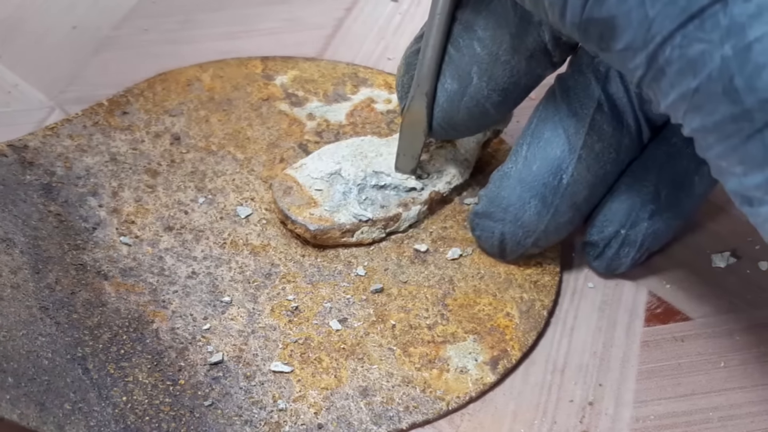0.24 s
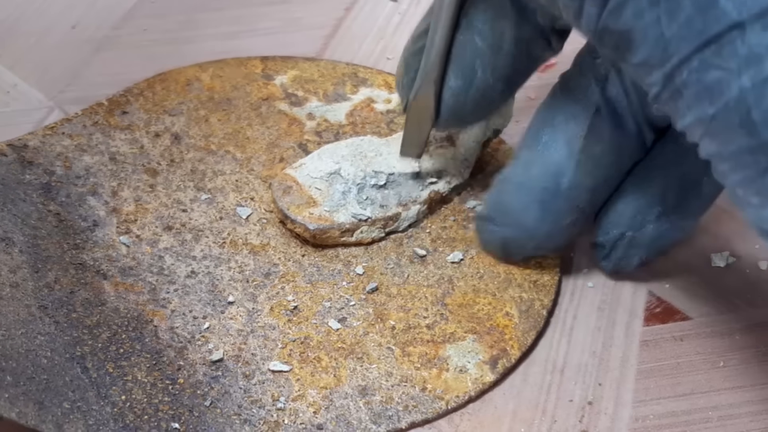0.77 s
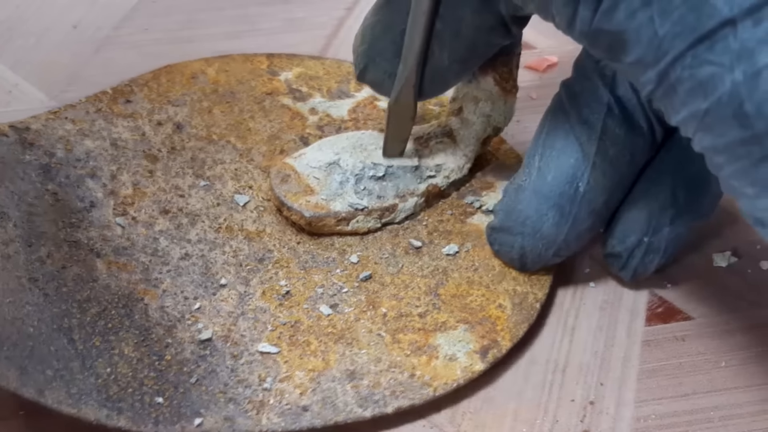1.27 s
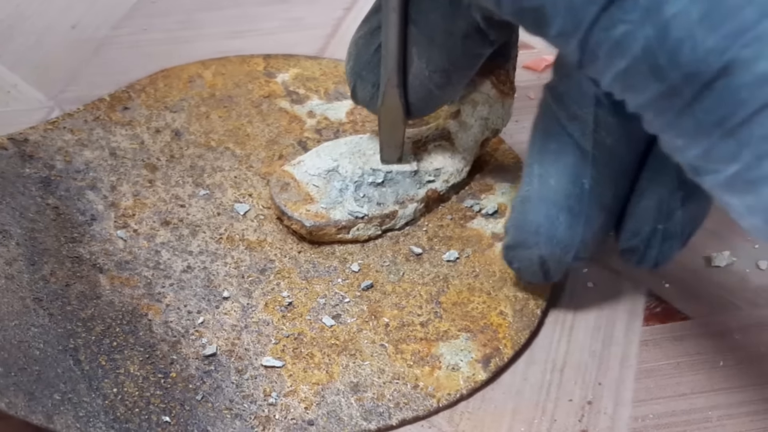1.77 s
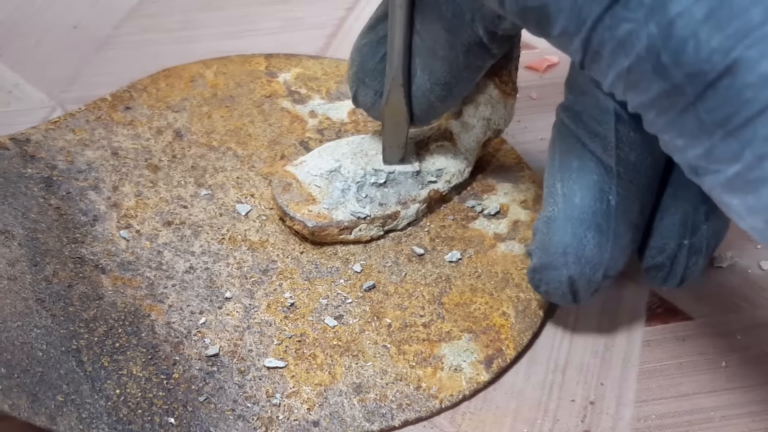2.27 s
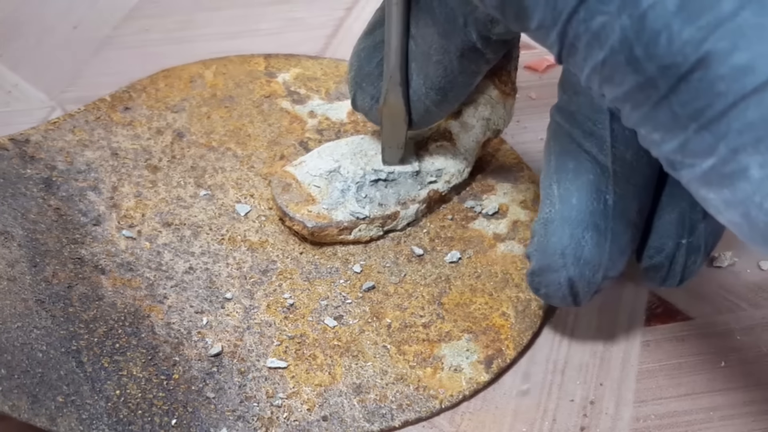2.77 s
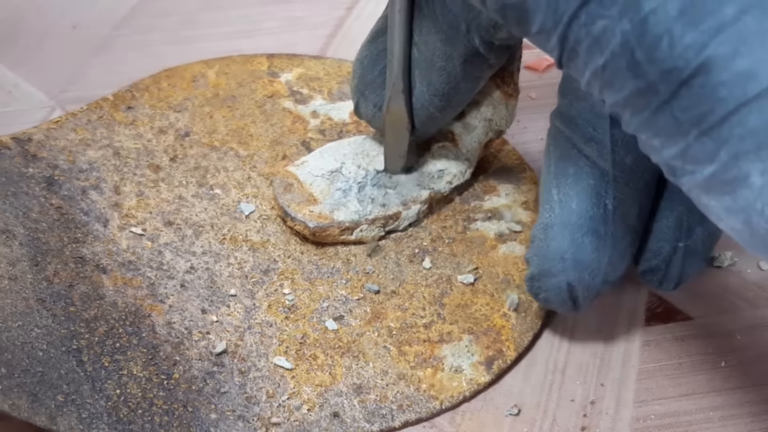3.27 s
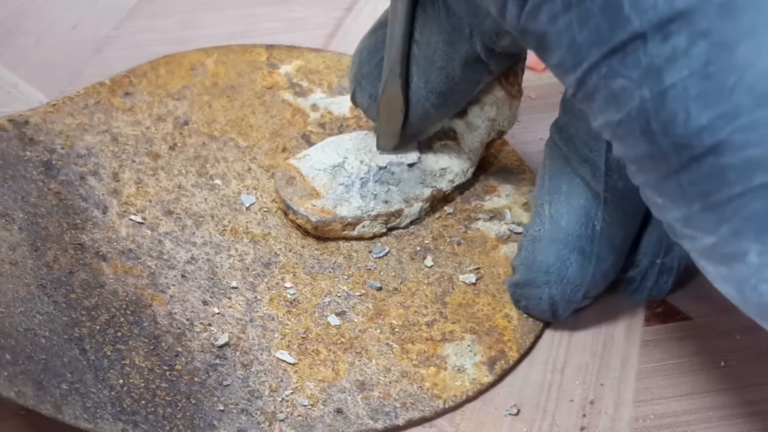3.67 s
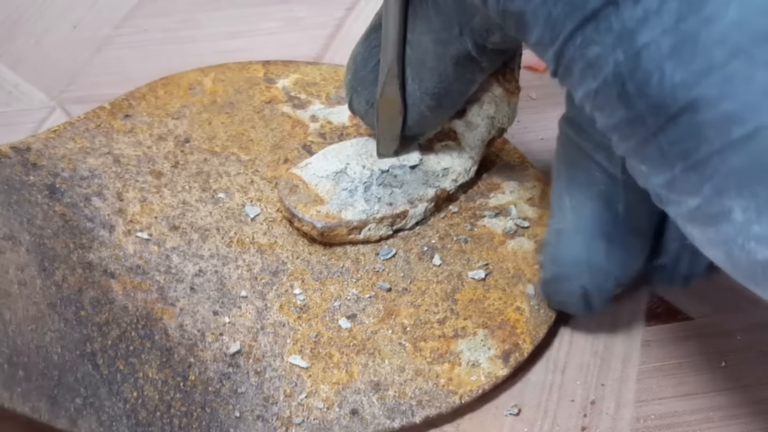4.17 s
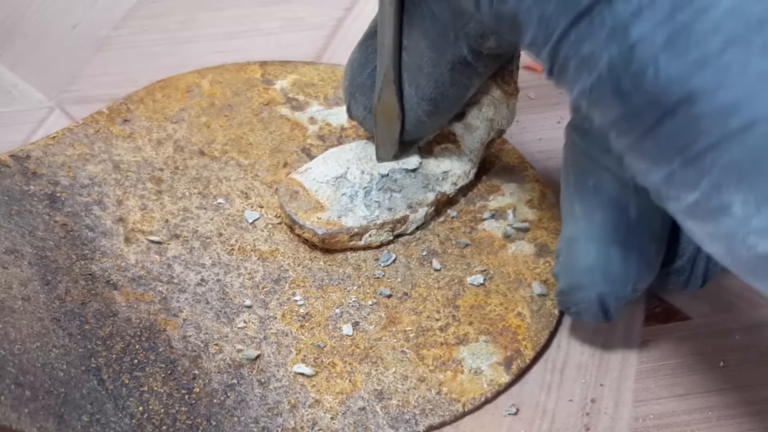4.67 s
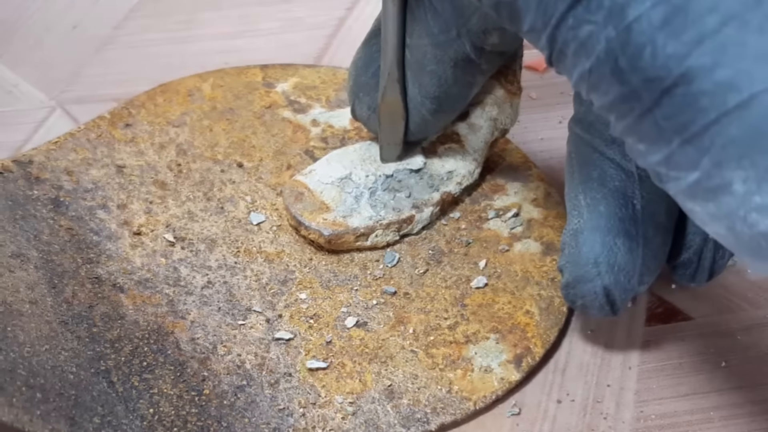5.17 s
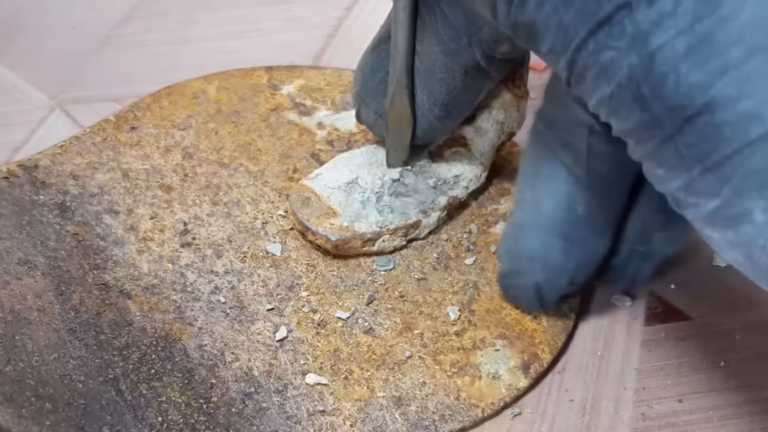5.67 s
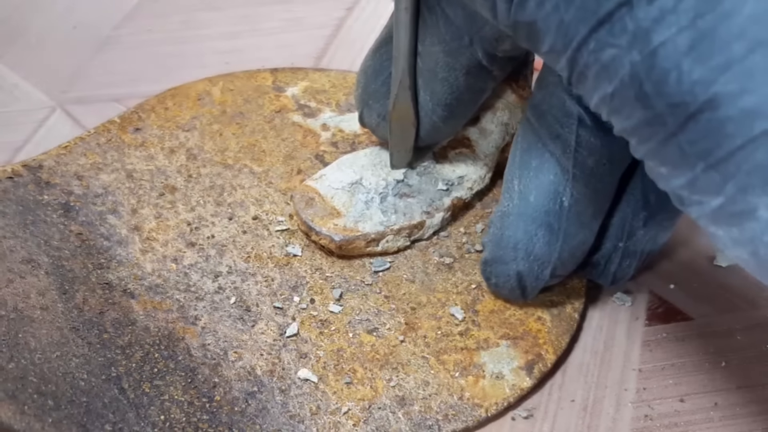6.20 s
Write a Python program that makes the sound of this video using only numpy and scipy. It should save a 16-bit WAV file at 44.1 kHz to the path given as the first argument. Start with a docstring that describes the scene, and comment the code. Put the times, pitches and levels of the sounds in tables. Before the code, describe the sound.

A hammer taps a steel chisel into crust on a rusty iron plate, hard clanks with low bench thumps, pauses, and flying chips ticking.

```python
"""A clank and a low thump come first: a hammer taps a steel chisel into the crust on a rusty iron plate.
The plate lies on a wooden bench in a small room. Fading sine waves make the clank, rings and low thump,
and short noise bursts make the cracking crust and the ticks of its landing chips.
Between bursts of blows the plate knocks softly on the bench and the blade scrapes and clinks.
A quiet floor of air noise with a faint, wavering hum runs underneath."""
import sys
import numpy as np
from scipy import signal
from scipy.fft import rfft, irfft
from scipy.io import wavfile
from scipy.ndimage import uniform_filter1d

SR = 44100
rng = np.random.default_rng(int(sys.argv[2]) if len(sys.argv) > 2 else 0)


def generate_wav(signal):
    """Clip the signal to [-1, 1] and save it as 16-bit WAV at the path in sys.argv[1]."""
    frames = np.transpose(np.atleast_2d(signal))
    scaled = np.clip(frames, -1, 1) * 32767
    pcm = np.round(scaled).astype(np.int16)
    wavfile.write(sys.argv[1], SR, pcm)


N = 284004

# In all tables, fade/s is the time a sound takes to drop by 60 dB.
# Air noise, relative spectrum: f/Hz, density/dB per Hz
AIR_COLOUR = [(15, -73), (30, -23), (85, -21), (150, -24), (330, -23), (410, -15.5), (460, -25.5),
              (800, -20), (1900, -30), (3300, -47.5), (7000, -49), (8500, -65), (16400, -60)]
# Air noise before its small swells: t/s, level/dB
AIR_LEVEL = [(0, -69), (2, -66), (3.6, -70), (6.44, -70)]
# The hum comes and goes: t/s, level/dB
HUM_LEVEL = [(0, -68), (.6, -79), (1.05, -64.5), (1.3, -78.5), (1.8, -71), (2, -65.5), (3.5, -99.5),
             (3.95, -73.5), (4.3, -70), (6.44, -71.5)]
# Likeness of left and right noise: f/Hz, likeness (1 same, 0 unrelated, -1 opposite)
LIKENESS = [(60, .87), (130, 0.53), (290, 1), (640, -0.46), (1400, -0.18), (3000, 0.008)]
# How long the room rings: f/Hz, fade/s
ROOM_FADE = [(300, 0.52), (1100, 0.32), (2900, 0.33), (5000, 0.26), (7700, 0.25), (14000, 0.23)]
# Room sound against the direct sound: f/Hz, level/dB
ROOM_COLOUR = [(400, 9), (1000, -0.5), (3000, -6), (8000, -11), (14000, -7)]
# Stroke of the blade over the crust, before the grit: t/s, level/dB
SCRAPE_LEVEL = [(1.42, -115), (1.44, -75.5), (1.601, -83), (1.631, -65.5), (1.698, -65), (1.714, -58),
                (1.735, -93), (1.8, -82.5)]
# Scrape noise, relative spectrum: f/Hz, density/dB per Hz
SCRAPE_COLOUR = [(880, 7.5), (1500, 10.5), (7090, 5.5), (9020, -9.5), (13200, 2), (16400, -17)]
# The plate knocks on the bench as it is shifted: t/s, level before the soft onset/dB, centre f/Hz
PLATE_KNOCKS = [(.617, -51.5, 1030), (.638, -51, 1010), (.646, -44.5, 330), (1.364, -52, 122),
                (1.392, -60, 165), (1.433, -55.5, 190), (1.509, -46.5, 129), (1.536, -46, 136),
                (3.722, -61.5, 192.7), (3.82, -55.5, 188)]
# The blade rebounds lightly off the plate: f/Hz, level/dB, fade/s
CLINK_TONES = [(2330, -40, .08), (5000, -52, .08), (3900, -55, .07), (6100, -55, .06)]
# Chips of crust and rebounds of the blade: t/s, level before panning and onset/dB, centre f/Hz
CHIP_TICKS = [(.4398, -53, 4760), (.4676, -49, 5400), (.539, -58, 6900), (.5926, -61, 6530),
              (.621, -63, 4700), (.6425, -61, 5500), (.648, -55.5, 3500), (.7706, -73, 6700),
              (1.4331, -72, 6800), (2.797, -60, 3980), (2.9781, -47, 3850), (3.0925, -57, 5500),
              (3.117, -63, 7040), (3.1632, -66, 4300), (3.1833, -66, 5400), (3.4458, -71, 7000),
              (3.4844, -67, 3574), (3.525, -70.5, 6470), (3.714, -72, 3900), (3.82, -69.5, 6300),
              (4.2092, -53, 4400), (4.211, -58, 10500), (5.8726, -40, 3440), (6.049, -64.5, 5100)]
# Low modes of bench and room, relative levels: f/Hz, level/dB, fade/s
LOW_MODES = [(76, -15, .8), (114, -8, .42), (151.5, 2, .46), (194, 2, .27), (231, -5, .42), (269, -2, .4),
             (290, 3, .38), (332, -1, .27), (365, 1, .22), (403, 4, .3), (453, 8, .22), (485, 0, .22),
             (537, 4, .14), (580, -2, .25)]
# Dull knock of the bench top, against the thump: f/Hz, level/dB, fade/s
BENCH_THUD = [(399.8, -8.5, 0.03), (215, -17.5, 0.056), (646, -11, 0.009)]
# Plate and blade, damped by glove and crust, relative levels: f/Hz, width/Hz, level/dB
STEEL_MODES = [(833, 105, 13.5), (1157, 101.4, 6.5), (1370, 169, 7), (1470, 130, -0.5), (1638, 124, 0.5),
               (1890, 160, -1.5), (2340, 83, -7.5), (2820, 150, -6.5), (3206, 100, -4.5), (3920, 140, 0.5),
               (4950, 200, -12), (6197, 110, 0.5), (7050, 230, 10), (9700, 120, -20.5), (11100, 250, -21.5),
               (14400, 400, -25)]
# Breaking crust, relative spectrum: f/Hz, density/dB per Hz
CRACK_COLOUR = [(450, -20), (650, -1.5), (1500, 2), (2500, 6.5), (3500, 5.5), (5000, 0), (7000, 7.5),
                (8300, -6), (10500, 3), (16000, -11)]
# Long rings, against the ring levels of each blow: f/Hz, level/dB, fade/s
HAMMER_TONES = [(3111, 1.5, .45)]
CHISEL_TONES = [(9400, -4, .2), (10700, -3, .2), (12966, 1, .38), (15138, 0, .27)]
# Centres of body, clank, snap and tick: f/Hz
BLOW_BANDS_HZ = (800, 1400, 4000, 11000)
# Every blow: t/s, then level/dB of bench thump, plate clank, steel-on-steel snap, treble tick,
# hammer ring and chisel ring, then the pitch the plate favours f/Hz
BLOWS = [(.033, -32.5, -31, -34.5, -43, -78, -80, 1370), (.333, -19, -25.5, -28, -39, -75, -66, 1140),
         (1.8136, -45.5, -40, -40.5, -56, -61.5, -77, 3200), (2.059, -25, -21, -19, -37.5, -63, -62, 2850),
         (2.355, -26, -24, -18.5, -36.5, -41.5, -78.5, 1380), (2.666, -22, -21.5, -20, -36, -49, -68, 1210),
         (2.936, -19.5, -29, -21.5, -28.5, -45.5, -60.5, 1450),
         (3.223, -16.5, -28, -20.5, -33.5, -40, -73.5, 2340),
         (4.094, -33.5, -36.5, -31.5, -46, -58, -65, 1577),
         (4.413, -21, -22.5, -25.5, -32.5, -56.5, -61, 1234), (4.676, -23.5, -20, -19, -29, -38, -67, 1704),
         (4.981, -19.5, -22, -23.5, -30, -42.5, -68, 1790),
         (5.253, -18.5, -19, -24, -28.5, -47.5, -67, 1764),
         (5.528, -18.5, -21, -26, -25.5, -43, -64.5, 1050), (5.811, -19, -19, -21, -29.5, -39, -65, 1750),
         (6.099, -20.5, -18, -25, -28, -42.5, -58.5, 776), (6.371, -23, -17.5, -20, -31, -48, -63, 1160)]

HUM_HZ, HUM_WIDTH_HZ = 116, 7
CLINK_S = 4.188
CRUMBS, CRUMB_DB, CRUMB_HZ = 14, -76, (4000, 7200)  # faint crumbs: count, middle level, pitch range
CHIP_PAN_DB = 4  # typical left-right level difference
BLOOM_DB, BLOOM_HZ, BLOOM_RISE_S, BLOOM_T60_S = -16, 330, 0.008, 0.32  # level is against the thump
# Flutter echo between two walls: spacing, first level against the thump, loss a trip, pulse width
FLUTTER_S, FLUTTER_DB, FLUTTER_LOSS_DB, KNOCK_S = 0.024, -2.5, 3.5, 0.0007
BOOM_TOP_HZ = 220  # modes below are the room's
FIRM_THUMP_DB, BOOM_DB, BOOM_DB_PER_DB = -18, -27.5, 1.35  # room boom grows faster than the thump
BODY_DB = -15  # plate body, against the thump
FAVOUR_DB, FAVOUR_OCTAVES = 6, .15  # the seat of the blade lifts plate modes near one pitch
EDGE_HZ = 16500  # top of the band


def gain_of(db):
    """Turn decibels into a plain multiplier."""
    return 10 ** (np.asarray(db) / 20)


def evened(x):
    """Scale a sound to an average (rms) level of 1."""
    return x / np.sqrt(np.mean(x ** 2) + 1e-20)


def read(points, hz):
    """Read a table at any pitch, along a logarithmic pitch scale."""
    f, value = np.transpose(points)
    return np.interp(np.log(hz + 1), np.log(f + 1), value)


def panned(db):
    """Left and right gains that differ by the given decibels."""
    return gain_of(np.array([[db], [-db]]) / 2)


def add(mix, s, sound):
    """Mix in a sound at a given second, cut off at the end of the scene."""
    part = mix[:, round(s * SR):][:, :sound.shape[1]]
    part += sound[:, :part.shape[1]]


def fading_tone(t, hz, db, t60, turns=0):
    """A sine wave that loses 60 dB in t60 seconds; turns shifts its start, in cycles."""
    return gain_of(db - 60 * t / t60) * np.sin(2 * np.pi * (hz * t) + 2 * np.pi * turns)


def onset(t, rise):
    """A smooth start, most of the way up after rise seconds."""
    return 1 - np.exp(-t / rise)


def coloured(points, size):
    """Two-channel noise of a given spectrum, with a left-right likeness that depends on pitch."""
    hz = np.fft.rfftfreq(size, 1 / SR)
    left, other = rfft(rng.standard_normal((2, size)))
    same = np.clip(read(LIKENESS, hz), -1, 1)
    right = same * left + np.sqrt(1 - same ** 2) * other
    return evened(irfft(np.array([left, right]) * gain_of(read(points, hz)), size))


def puffs(events, spread, t60, rise):
    """Each contact is a short fading puff of noise around its own centre pitch."""
    out, t = np.zeros((2, N)), np.arange(SR // 3) / SR
    noises = rng.standard_normal((len(events), 2, len(t)))
    for (s, db, hz, *pan_db), noise in zip(events, noises):
        edges = [hz / spread, min(hz * spread, 18000)]
        band = signal.butter(2, edges, "bandpass", fs=SR, output="sos")
        noise = noise if pan_db else noise[[0, 0]]  # without a pan, both sides hear the same noise
        puff = evened(signal.sosfilt(band, noise)) * gain_of(db - 60 * t / t60) * onset(t, rise)
        add(out, s, panned(sum(pan_db)) * puff)
    return out


def floor():
    """Distant air noise that swells a little, and a wavering hum of narrow-band noise."""
    t = np.arange(N) / SR
    swell = evened(sum(np.sin(2 * np.pi * (f * t + rng.random())) / np.sqrt(f)
                       for f in np.geomspace(.5, 12, 16)))
    edges = [HUM_HZ - HUM_WIDTH_HZ / 2, HUM_HZ + HUM_WIDTH_HZ / 2]
    band = signal.butter(1, edges, "bandpass", fs=SR, output="sos")
    hum = evened(signal.sosfilt(band, rng.standard_normal(N)))
    hum = hum * gain_of(np.interp(t, *np.transpose(HUM_LEVEL)))
    air_db = np.interp(t, *np.transpose(AIR_LEVEL)) + 1.1 * swell
    return coloured(AIR_COLOUR, N) * gain_of(air_db) + hum


def room(x):
    """Sparse echoes of random sign, one in every 20 samples, each band dying at its own speed."""
    taps = np.zeros((2, SR))
    at = np.arange(160, SR - 20, 20)
    at = at + rng.integers(0, 20, (2, len(at)))
    np.put_along_axis(taps, at, rng.choice([-1., 1.], at.shape), 1)
    hz, t, bands = signal.stft(taps, SR, nperseg=256)
    bands = bands * gain_of(-60 * t / read(ROOM_FADE, hz)[:, None])
    plain = signal.istft(bands, SR, nperseg=256)[1]
    tail = signal.istft(bands * gain_of(read(ROOM_COLOUR, hz))[:, None], SR, nperseg=256)[1]
    # the uncoloured left tail sets the scale
    return signal.fftconvolve(x, tail / np.linalg.norm(plain[0]), axes=1)[:, :N]


def scrape():
    """The blade drags over the crust: noise with a gritty, jumpy level under the stroke."""
    s, db = np.transpose(SCRAPE_LEVEL)
    t = np.arange(s[0], s[-1], 1 / SR)
    grit_db = 3 * evened(uniform_filter1d(rng.standard_normal(len(t)), 60))
    stroke = gain_of(np.interp(t, s, db) + grit_db) * signal.windows.tukey(len(t), .1)
    out = np.zeros((2, N))
    add(out, s[0], coloured(SCRAPE_COLOUR, len(t)) * stroke)
    return out


def knocks():
    """The plate meets the bench in soft, dull noise puffs."""
    return puffs(PLATE_KNOCKS, spread=1.29, t60=0.14, rise=0.0067)


def clink():
    """A light touch of steel: a few short tones with a soft start."""
    out, t = np.zeros((2, N)), np.arange(SR // 4) / SR
    ring = sum(fading_tone(t, *tone) for tone in CLINK_TONES)
    add(out, CLINK_S, (ring * onset(t, .015) ** 2)[None])
    return out


def chips():
    """Bright noise ticks scattered left and right, plus faint crumbs at chance moments."""
    when, size, pitch = rng.random((CRUMBS, 3)).T
    crumb_db = CRUMB_DB + 6 * (size - .5)
    crumbs = np.transpose([when * N / SR, crumb_db, np.interp(pitch, (0, 1), CRUMB_HZ)])
    ticks = np.vstack([CHIP_TICKS, crumbs])
    pan_db = CHIP_PAN_DB * rng.standard_normal((len(ticks), 1))
    return puffs(np.hstack([ticks, pan_db]), spread=1.6, t60=.03, rise=.0002)


def bloom():
    """The bench rumbles roughly just after each blow: a longer, low puff of noise."""
    rumbles = [(s, bench_db + BLOOM_DB, BLOOM_HZ) for s, bench_db, *_ in BLOWS]
    return puffs(rumbles, spread=1.64, t60=BLOOM_T60_S, rise=BLOOM_RISE_S)


def flutter():
    """One low push and pull, coming back weaker and weaker between two walls."""
    t, trip = np.arange(SR // 4) / SR, np.arange(8)[:, None]
    u = (t - .0042 - FLUTTER_S * trip) / KNOCK_S  # time from each pulse centre, in pulse widths
    pulses = -gain_of(FLUTTER_DB - FLUTTER_LOSS_DB * trip) * u * np.exp((1 - u ** 2) / 2)
    return pulses.sum(0)[None]


def thump(deep, scatter_db):
    """Low modes of the room (deep) or bench swing nearly in step about 5 ms after the blow, then fade."""
    t = np.arange(SR * 3 // 4) / SR
    modes = [mode + ((-1) ** k,) for k, mode in enumerate(LOW_MODES)]
    hz, db, t60, side = np.array(modes).T[:, :, None]
    apart = (-.00005 + .00014 * side) * np.array([1, -1])[:, None, None]  # s, opposite shifts left and right
    ring = -gain_of(db - 60 * t / t60) * np.sin(2 * np.pi * hz * (t - .005 + apart))
    ring = ring * ((hz < BOOM_TOP_HZ) == deep)
    ring = ring * onset(t, .005)  # the room fills over some ms
    return np.einsum("bm,cmt->bct", gain_of(scatter_db), ring) / abs(ring.sum(1)).max()


def thud(t):
    """The bench top answers with a dull knock of a few short tones."""
    return sum(fading_tone(t, *tone) for tone in BENCH_THUD)[None] * onset(t, 0.00084)


def clank(t, colour, favoured_hz, paths, chance):
    """Plate and blade ring in damped modes, seated a little differently at each blow."""
    hz, width, db = np.transpose(STEEL_MODES)[:, :, None]
    level, tune, turn = chance
    lift_db = FAVOUR_DB * np.exp(-(np.log2(hz / favoured_hz) / FAVOUR_OCTAVES) ** 2)
    strength = gain_of(db + read(colour, hz) + lift_db + 1.5 * level)
    seated_hz = hz * (1 + .015 * tune)
    swing = np.sin(2 * np.pi * (seated_hz * t + paths + 0.14 * turn))
    modes = strength * np.exp(-np.pi * width * t) * swing
    return modes.sum(1) * onset(t, .0006)


def crack(t, colour):
    """Crust breaks under the edge: a very short burst of coloured noise."""
    hz = np.fft.rfftfreq(len(t), 1 / SR)
    noise = rfft(rng.standard_normal((2, len(t))))
    return irfft(noise * gain_of(read(CRACK_COLOUR, hz) + read(colour, hz))) * np.exp(-t / 0.0052)


def long_ring(tones, tone_db):
    """Hammer or chisel sings on in fading sine tones, the right side .3 radian ahead."""
    t = np.arange(SR * 3 // 4) / SR
    turns = np.array([[0], [.3]]) / (2 * np.pi)
    return sum(fading_tone(t, hz, db + held_db, t60, turns)
               for (hz, db, t60), held_db in zip(tones, tone_db))


def blows():
    """Each blow drives the clank of the steel, its long rings and the low thump."""
    steel, rings, low = np.zeros((3, 2, N))
    scatter_db = 2.5 * rng.standard_normal((len(BLOWS), len(LOW_MODES)))  # no two load the bench alike
    benches, booms = thump(False, scatter_db), thump(True, scatter_db)
    t = np.arange(4096) / SR
    count = len(STEEL_MODES)
    # cycles: modes take turns in leading on the left or the right
    lead = 0.16 * np.array([1, -1])[:, None, None] * (-1) ** np.arange(count)[:, None]
    paths = rng.random((count, 1)) + lead
    knock, echoes = thud(t), flutter()
    for row, bench, boom in zip(BLOWS, benches, booms):
        s, bench_db, clank_db, snap_db, tick_db, hammer_db, chisel_db, favoured_hz = row
        boom_db = BOOM_DB + BOOM_DB_PER_DB * (bench_db - FIRM_THUMP_DB)
        add(steel, s, gain_of(bench_db) * knock)
        add(low, s, gain_of(bench_db) * echoes)
        add(low, s, gain_of(bench_db) * panned(-2.5) * bench + gain_of(boom_db) * boom)
        colour = list(zip(BLOW_BANDS_HZ, (bench_db + BODY_DB, clank_db, snap_db, tick_db)))
        chance = rng.standard_normal((3, count, 1))
        hit = clank(t, colour, favoured_hz, paths, chance) + crack(t, colour)
        add(steel, s, panned(0.46) * hit * onset(t, 0.0005))
        grip_db = 3 * rng.standard_normal(len(CHISEL_TONES))  # the fingers damp the shank unevenly
        add(rings, s, long_ring(HAMMER_TONES, [hammer_db]))
        add(rings, s, long_ring(CHISEL_TONES, chisel_db + grip_db))
    return steel, rings, low


def scene():
    """Mix the direct sounds with the room's answer to the steel, scrape, rings and chips."""
    steel, rings, low = blows()
    ticks, near = chips(), steel + scrape()
    far_rings = gain_of(-8) * rings  # a thin ring carries little into the room
    echo = room(near + far_rings + gain_of(1.5) * ticks)
    direct = near + rings + ticks
    return direct + echo + low + clink() + bloom() + knocks() + floor()


def record(dry):
    """Small microphones lose the deep bass, the input rounds the highest peaks; then the band limit."""
    thin = signal.sosfilt(signal.butter(4, 58, "highpass", fs=SR, output="sos"), dry)
    rounded = .29 * np.tanh(thin / .29)
    band_limit = signal.firwin(511, EDGE_HZ, window=("kaiser", 9), fs=SR)
    return signal.oaconvolve(rounded, band_limit[None], "same")


dry = scene()
out = record(dry)
generate_wav(out)
```